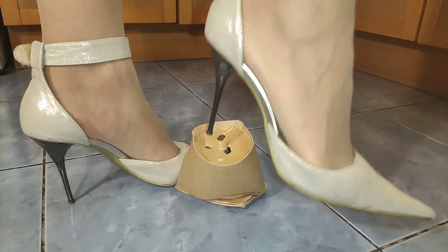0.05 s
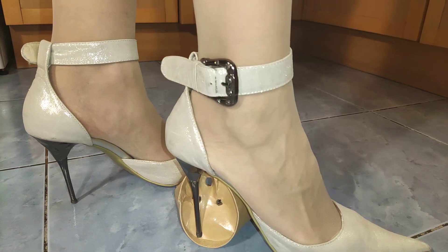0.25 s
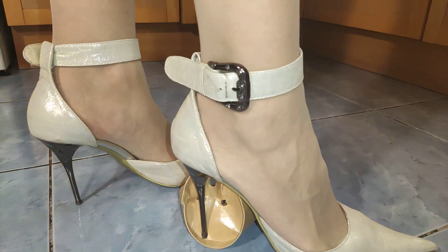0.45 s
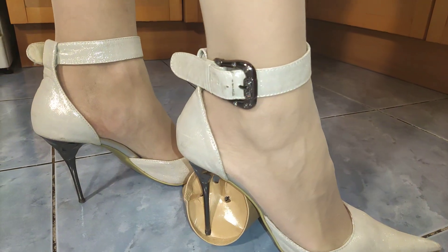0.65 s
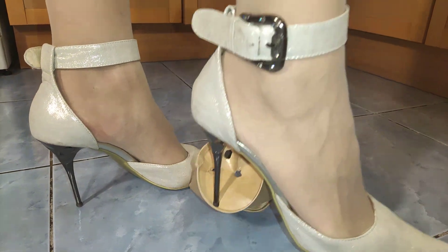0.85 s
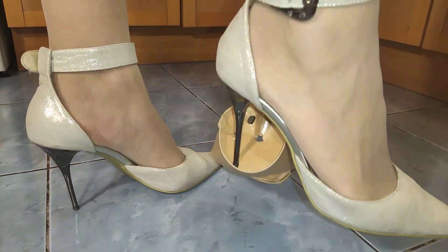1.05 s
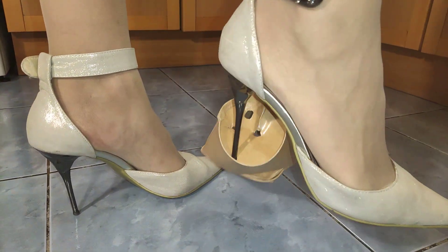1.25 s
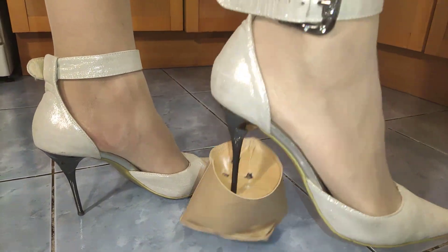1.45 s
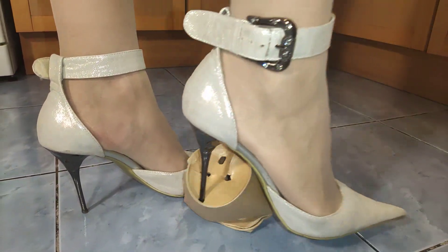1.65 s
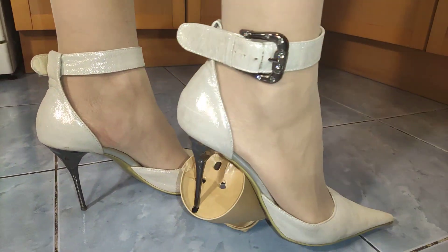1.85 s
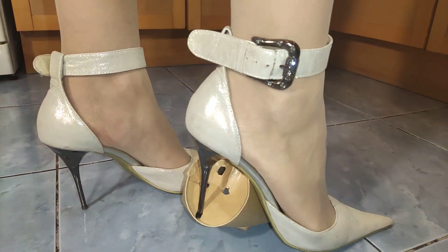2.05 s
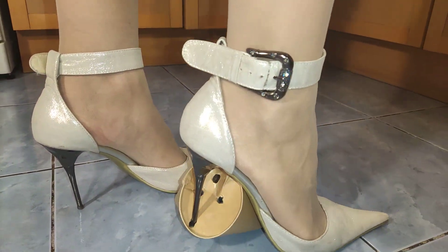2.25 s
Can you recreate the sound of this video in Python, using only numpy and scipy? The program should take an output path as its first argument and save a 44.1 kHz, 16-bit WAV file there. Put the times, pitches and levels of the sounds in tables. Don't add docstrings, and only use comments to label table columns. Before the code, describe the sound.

Crisp hollow crunch of a stiff paper cup under a stiletto heel, then a weaker second crunch

```python
import sys
import numpy as np
from scipy import signal
from scipy.fft import rfft, irfft, next_fast_len
from scipy.io import wavfile
from scipy.ndimage import uniform_filter1d

SR = 44100
rng = np.random.default_rng(int(sys.argv[2]) if len(sys.argv) > 2 else 0)


def gain_from_db(level_db):
    decades = np.asarray(level_db, float) / 20
    return 10 ** decades


def log_audio(samples):
    frames = np.atleast_2d(samples).T
    limited = np.clip(frames, -1, 1)
    pcm = np.round(limited * 32767).astype(np.int16)
    wavfile.write(sys.argv[1], SR, pcm)


N = 101429
LAG = 4


def evened(x):
    return x / np.sqrt(np.mean(x ** 2) + 1e-20)


def peaked(x, db):
    return gain_from_db(db) * x / abs(x).max()


def read(points, hz):
    f, value = np.transpose(points)
    return np.interp(np.log(hz + 1), np.log(f + 1), value)


def add(mix, s, sound):
    part = mix[round(s * SR):][:len(sound)]
    part += sound[:len(part)]


def resonate(x, hz, width):
    b, a = signal.iirpeak(min(hz, .45 * SR), max(hz / width, .3), SR)
    return signal.lfilter(b, a, x)


def colour(x, curve):
    size = next_fast_len(x.shape[-1])
    gain = gain_from_db(read(curve, np.fft.rfftfreq(size, 1 / SR)))
    return irfft(rfft(x, size) * gain, size)[..., :x.shape[-1]]


def at_ears(x):
    return np.array([np.roll(x, LAG), x])


def air():
    # (frequency [Hz], density [dB per Hz])
    hush = [(20, 2), (60, -22.5), (110, -23.5), (250, -21), (700, -27.5), (3000, -33.5), (8500, -45),
            (15500, -42)]
    # (frequency [Hz], likeness [-1..1])
    likeness = [(60, 0.31), (380, 0.48), (2380, 0.031), (15000, 0.01)]
    # (frequency [Hz], level [dB])
    hum_partials = [(49.5, -62.5), (100, -60.5), (199.5, -68)]
    hush_db, patch_db = -55, 1.0

    frames, hz = N // 256 + 5, np.fft.rfftfreq(1024, 1 / SR)
    a, b, c, d, patches = rng.standard_normal((frames, 513, 5)).T
    patches = evened(uniform_filter1d(uniform_filter1d(patches, 12, 0), 14, 1))
    same = np.clip(read(likeness, hz), -1, 1)[:, None]
    left = a + 1j * b
    right = same * left + np.sqrt(1 - same ** 2) * (c + 1j * d)
    z = np.array([left, right]) * gain_from_db(read(hush, hz)[:, None] + patch_db * patches)
    noise = signal.istft(z, nperseg=1024, noverlap=768)[1][:, :N]
    hum = sum(gain_from_db(db) * evened(resonate(rng.standard_normal(N), f, 4.67)) for f, db in hum_partials)
    return gain_from_db(hush_db) * evened(noise) + hum


def rubs():
    # (start [s], length [s], hollow level [dB], hiss level [dB], grit level [dB])
    strokes = [(0.038, 0.35, -66.5, -66.5, -85), (0.205, 0.11, -30, -33.5, -46.5),
               (0.296, 0.063, -26.5, -42, -47.5), (0.357, 0.18, -45.5, -46, -58.5),
               (0.673, 0.12, -54.5, -62.5, -72), (0.715, 0.098, -56, -53.5, -61),
               (0.776, 0.26, -57.5, -66.5, -73), (0.874, 0.11, -50.5, -53.5, -57),
               (1.42, 0.2, -64, -66.5, -89.5), (1.498, 0.45, -48.5, -56, -82), (1.587, 0.2, -40, -54, -59),
               (1.708, 0.069, -51, -56, -48.5), (1.748, 0.13, -47, -43.5, -47.5),
               (1.85, 0.2, -57.5, -67, -89.5), (1.957, .055, -50, -67, -95), (2.056, 0.14, -51.5, -54, -93),
               (2.122, 0.12, -48, -56.5, -79), (2.18, 0.1, -51, -66, -85), (2.245, 0.35, -42.5, -49, -64)]
    bursts = [
        (.261, 0.03, -27, -28, -41),
        (0.281, 0.035, -23, -29, -38),
        (1.5792, 0.04, -29, -37, -45),
    ]
    # (frequency [Hz], width [Hz], level [dB])
    cup_modes = [(330, 240, -7.5), (606.6, 81, -2.5), (730, 76, -1), (900, 190, -1.5), (1211, 165, -1),
                 (1536, 300, -7), (2050, 780, -18.5), (2600, 1200, -13.5)]
    # (frequency [Hz], density [dB per Hz])
    hiss = [(800, -35), (1600, 0.5), (3000, -2), (5500, -5), (8500, -17.5), (16000, -40)]
    # (frequency [Hz], density [dB per Hz])
    grit = [(2500, -22), (6000, 2), (9000, -5.5), (12000, -1), (15500, -4)]
    slips_per_s, slip_spread_db, clump_db = 4000, 2.4, 2.2
    far_wall_db = -9
    hiss_same = 0.73
    stroke_skew = 0.59

    strength = gain_from_db(slip_spread_db * np.minimum(rng.exponential(1, N), 4))
    slips = strength * (rng.random(N) < slips_per_s / SR) * rng.standard_normal(N)

    walls = np.array([slips, slips[::-1]])
    near, far = sum((-1) ** k * gain_from_db(db) * evened(resonate(walls, hz, width))
                    for k, (hz, width, db) in enumerate(cup_modes))
    body = at_ears(near) + gain_from_db(far_wall_db) * np.array([far, -far])

    density = np.sqrt(uniform_filter1d(slips ** 2, 60).clip(0))
    noise = rng.standard_normal((3, N)) * (1.2 + evened(density))
    clumps = uniform_filter1d(uniform_filter1d(rng.standard_normal(N), 150), 150)
    noise = noise * gain_from_db(clump_db * evened(clumps))
    noise = hiss_same * at_ears(noise[0]) + np.sqrt(1 - hiss_same ** 2) * noise[1:]

    power = np.zeros((N, 3))
    for s, length, *db in strokes + bursts:
        shape = np.sin(np.pi * np.linspace(0, 1, int(length * SR)) ** stroke_skew) ** 4
        add(power, s, shape[:, None] * gain_from_db(2 * np.array(db)))
    layers = body, colour(noise, hiss), colour(noise, grit)
    return sum(evened(x) * np.sqrt(p) for x, p in zip(layers, power.T))


def ticks():
    # (time [s], peak level [dB], lowest frequency [Hz])
    tick_table = [(.0642, -33, 3500), (.2012, -15, 2000), (.2074, -20, 7000), (.2486, -18, 4000),
                  (.2502, -23, 8000), (.235, -27, 3000), (.2697, -24, 3500), (.287, -16, 5000),
                  (.2888, -16, 7000), (.450, -36, 6000), (.5462, -36, 6000), (.7155, -31, 4200),
                  (1.074, -54, 2500), (1.1797, -54, 2500), (1.58, -17, 1500), (1.5848, -23, 3500),
                  (1.6295, -37, 7000), (1.7245, -43, 4000), (1.768, -42, 9000), (1.821, -40, 9000),
                  (1.886, -46, 6000), (2.0772, -52, 1500), (2.2228, -49, 6500), (2.297, -44, 3000)]
    t60 = .009
    out, t = np.zeros(N), np.arange(600) / SR
    for (s, db, hz), noise in zip(tick_table, rng.standard_normal((len(tick_table), 600))):
        click = 2 * (t == 0)
        spit = signal.lfilter([1], [1, -.3], noise * gain_from_db(-60 * t / t60) + click)
        treble = signal.butter(4, hz, "high", fs=SR, output="sos")
        add(out, s, peaked(signal.sosfilt(treble, spit), db))
    return out


def pops():
    # (time [s], peak level [dB], hollow pitch [Hz], ring t60 [s], upper mode level [dB])
    pop_table = [(0.065, -43.5, 1220, 0.0055, -4), (.2016, -16.5, 640, 0.016, 1),
                 (.2052, -18.5, 565, 0.011, 7.5), (.2075, -15.5, 733, 0.014, -8),
                 (.2231, -23, 700, 0.011, -10), (0.2353, -15.5, 740, 0.016, 1),
                 (.2495, -14.5, 846, 0.02, 3), (.264, -24, 760, 0.026, 6), (0.2789, -10, 680, 0.012, -20),
                 (0.2834, -1.5, 900, 0.0065, 3), (.2857, -14.5, 650, 0.032, -19),
                 (.2893, -14.5, 752, .03, -21), (0.2934, -9.5, 1050, .008, -8),
                 (0.2943, -1.5, 950, 0.0075, 4), (.2993, -13.5, 800, .02, -9),
                 (.3092, -19, 833, .015, -5.5), (.463, -35, 1066, 0.031, -9),
                 (0.6064, -36, 778, 0.024, -1.5), (.7235, -40.5, 1000, 0.019, -16),
                 (0.7883, -36, 745, 0.029, -24), (.833, -53.5, 822, 0.032, -15),
                 (0.902, -33, 1000, 0.0081, -4.5), (.918, -37.5, 730, 0.025, -6.5),
                 (1.564, -40.5, 730, 0.14, -14), (1.5803, -16, 616, 0.023, -4),
                 (1.5816, -13, 865, 0.039, -9), (1.5858, -14.5, 900, 0.022, -26),
                 (1.596, -20, 790, 0.0067, -8), (1.6141, -14.5, 670, 0.0099, 3),
                 (1.6285, -24.5, 641, 0.043, -14), (1.651, -37, 850, 0.022, -10),
                 (1.7315, -22, 713, 0.027, -1.5), (1.7733, -23, 982, 0.018, -9.5),
                 (1.839, -32.5, 900, 0.013, 5), (1.965, -48, 660, 0.059, 3), (2.0773, -29.5, 595, 0.005, 9),
                 (2.087, -40, 960, 0.016, -12.5), (2.152, -29.5, 900, 0.0081, 5),
                 (2.16, -36, 1290, 0.034, -2), (2.287, -42.5, 685, 0.045, -9)]
    upper_ratio, crack_db, crack_t60 = 1.25, -27, 0.013
    hold = 1.5
    attack = 0.00033
    out, t = np.zeros(N), np.arange(3000) / SR
    for (s, db, hz, t60, upper_db), noise in zip(pop_table, rng.standard_normal((len(pop_table), 3000))):
        lower = np.sin(2 * np.pi * hz * t)
        upper = gain_from_db(upper_db - 30 * t / t60) * np.sin(2 * np.pi * hz * upper_ratio * t)
        ring = (lower + upper) * gain_from_db(-60 * (t / t60) ** hold) * np.minimum(t / attack, 1)
        crack = gain_from_db(crack_db - 60 * t / crack_t60) * noise
        add(out, s, peaked(ring + crack, db))
    return out


def snaps():
    # (time [s], peak level [dB], pitch [Hz], t60 [s])
    snap_table = [(0.201, -9, 2790, 0.0066), (0.2008, -19, 4390, 0.0034), (0.2033, -19, 2800, 0.02),
                  (0.2148, -28, 3090, 0.029), (0.2192, -29, 2920, 0.012), (0.2345, -19.5, 1980, 0.0053),
                  (0.2486, -14, 5800, 0.0064), (0.264, -22, 7780, 0.02), (0.2683, -16.5, 4895, 0.04),
                  (0.269, -31, 8300, 0.014), (.272, -26, 4720, .025), (0.2865, -18.5, 6050, 0.012),
                  (0.285, -18, 2600, .04), (0.9045, -51, 3025, 0.067), (1.58, -16, 2475, 0.004),
                  (1.583, -26.5, 5740, 0.0083), (1.5853, -26, 4380, 0.012), (1.628, -33, 5770, 0.0086),
                  (1.6278, -33, 3630, 0.016), (1.6302, -26, 5600, 0.014), (1.633, -33.5, 3000, 0.034),
                  (1.7295, -37, 7100, .012), (1.7725, -33, 2720, 0.018), (2.087, -53, 3000, 0.086),
                  (2.108, -45.5, 3030, 0.069), (2.15, -49, 3020, 0.22)]
    width = 0.42
    out, t = np.zeros(N), np.arange(5000) / SR
    for (s, db, hz, t60), noise in zip(snap_table, rng.standard_normal((len(snap_table), 5000))):
        fuzz = evened(resonate(noise, hz, 3 * width * hz))
        ring = np.sin(2 * np.pi * hz * t) + fuzz
        add(out, s, peaked(resonate(ring * gain_from_db(-60 * t / t60), hz, width * hz), db))
    return out


def thuds():
    # (time [s], peak level [dB], pitch [Hz])
    thud_table = [(.201, -34.5, 108), (0.237, -32.5, 96), (0.286, -19, 119), (0.292, -13, 320),
                  (0.302, -31.5, 61.3), (0.344, -36.5, 120.7), (.392, -35.5, 136), (.425, -41, 171),
                  (0.922, -44.5, 130), (1.581, -36, 168.3), (1.583, -19, 306), (1.733, -31, 163),
                  (1.735, -37, 250), (1.775, -41.5, 135)]
    out = np.zeros(N)
    for s, db, hz in thud_table:
        turns = np.arange(0, 6, hz / SR)
        push = np.sin(2 * np.pi * turns) * np.exp(-turns / 1.6 * 2)
        add(out, s, peaked(push, db))
    return out


def room(x):
    # (frequency [Hz], t60 [s])
    decay = [(100, 0.31), (700, 0.45), (3000, 0.55), (12000, 0.35)]
    taps = np.zeros((2, SR))
    at = np.arange(120, SR - 20, 20) + rng.integers(0, 20, (2, (SR - 121) // 20))
    np.put_along_axis(taps, at, rng.choice([-1., 1.], at.shape), 1)
    hz, t, z = signal.stft(taps, SR, nperseg=256)
    tail = signal.istft(z * gain_from_db(-60 * t / read(decay, hz)[:, None]), SR, nperseg=256)[1]
    shared = colour(tail[0], [(500, -2.0), (3000, -27.5)])
    tail[1] = shared + colour(tail[1], [(200, -1), (2000, 3.1)])
    tail = tail / np.linalg.norm(tail, axis=1, keepdims=True)
    return signal.fftconvolve(x[None], tail, axes=1)[:, :N]


def scene():
    snap, tick = snaps(), ticks()
    sharp = np.array([np.roll(snap, LAG // 2) + np.roll(tick, LAG // 4), snap + tick])
    cup = at_ears(pops() + thuds()) + rubs() + gain_from_db([[-2.4], [1.4]]) * sharp
    return cup + gain_from_db(-8) * room(cup[1]) + air()


def top_cut(x):
    return signal.sosfilt(signal.butter(12, 16970, fs=SR, output="sos"), x)


def record(dry):
    # (frequency [Hz], level [dB])
    left_colour = [(40, -4), (300, 0.5), (3000, 0.5), (8000, -1), (15000, -1)]
    x = np.array([colour(dry[0], left_colour), dry[1]])
    x = 1.1 * np.tanh(x / 1.1)
    low_pass = signal.firwin(255, 15950, window=("kaiser", 8), fs=SR)
    x = signal.oaconvolve(x, low_pass[None], "same")
    return top_cut(x)


dry = scene()
out = record(dry)
log_audio(out)
```